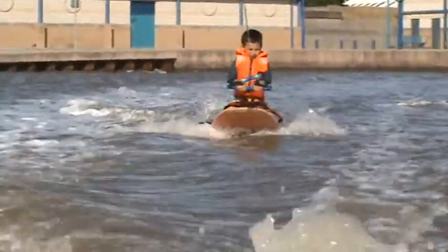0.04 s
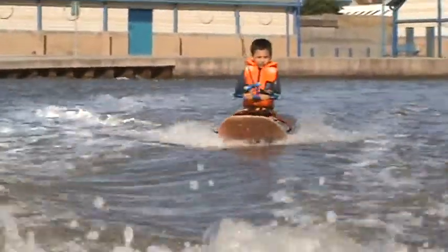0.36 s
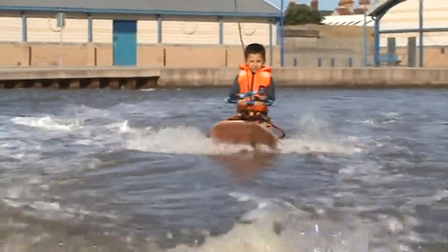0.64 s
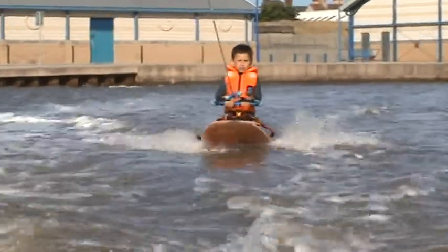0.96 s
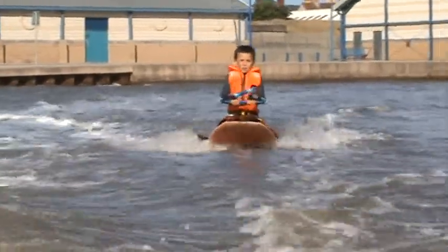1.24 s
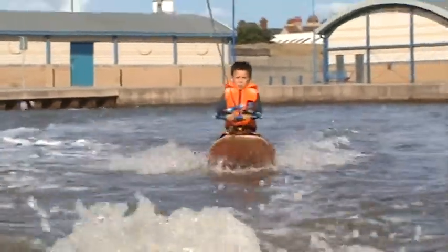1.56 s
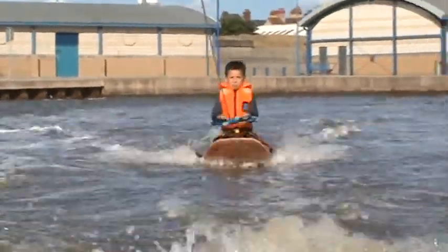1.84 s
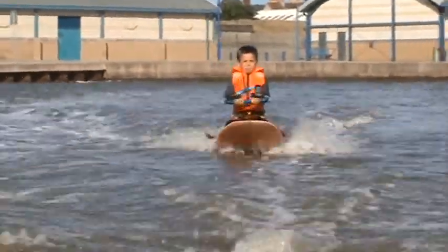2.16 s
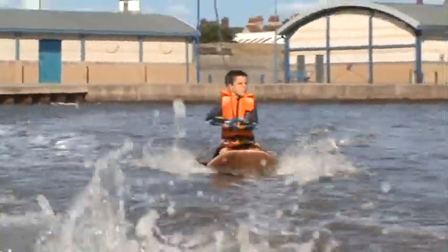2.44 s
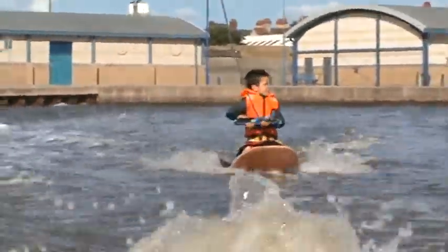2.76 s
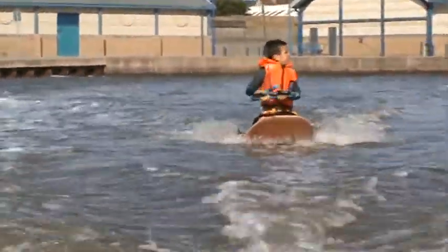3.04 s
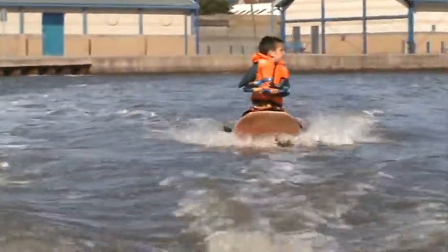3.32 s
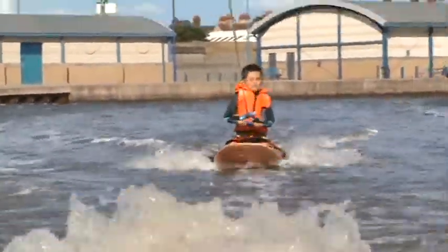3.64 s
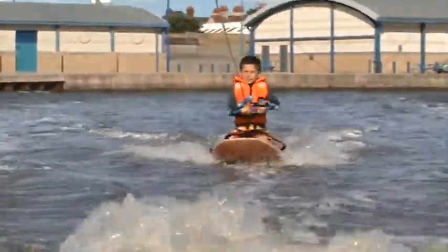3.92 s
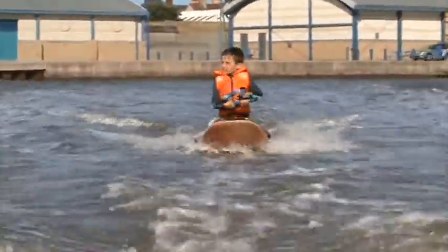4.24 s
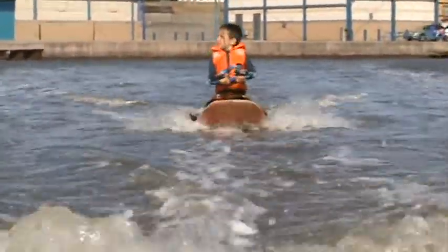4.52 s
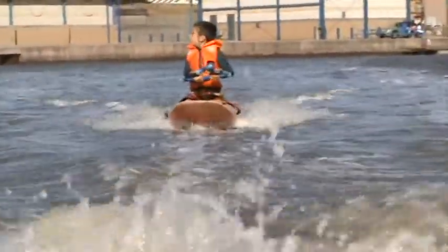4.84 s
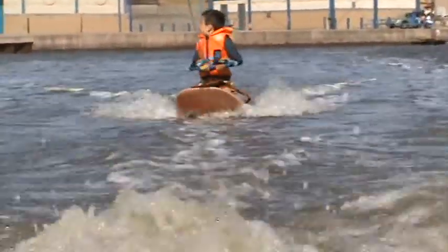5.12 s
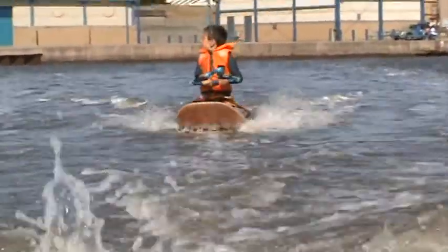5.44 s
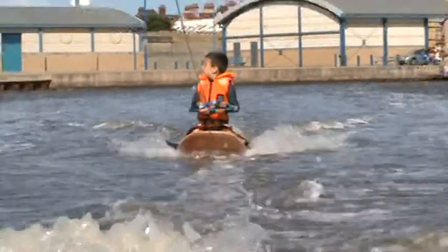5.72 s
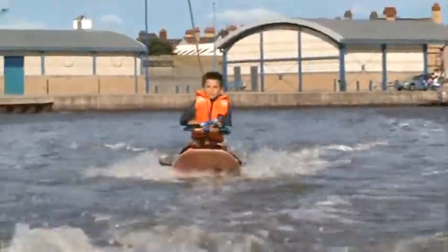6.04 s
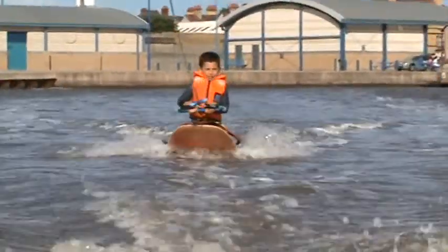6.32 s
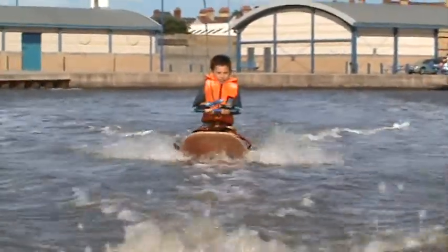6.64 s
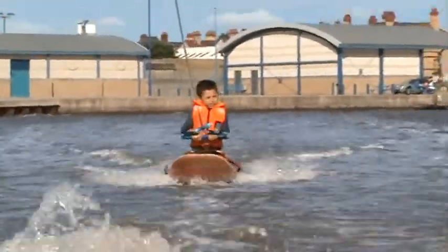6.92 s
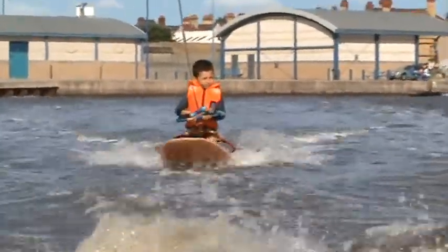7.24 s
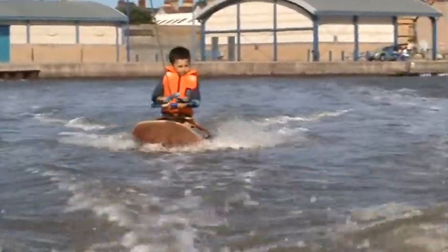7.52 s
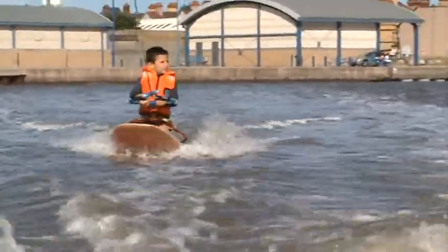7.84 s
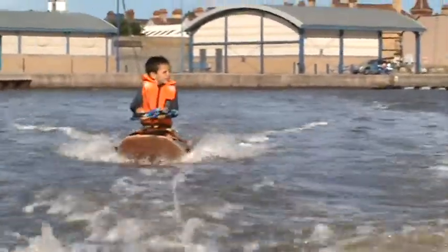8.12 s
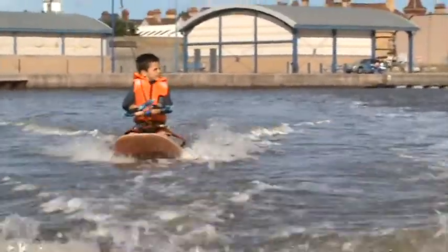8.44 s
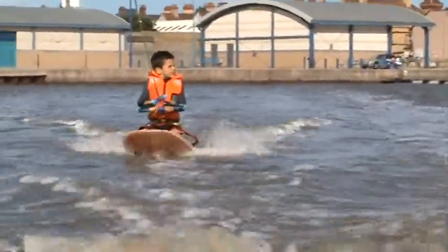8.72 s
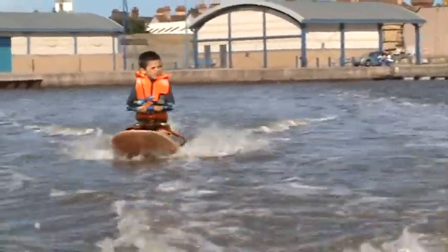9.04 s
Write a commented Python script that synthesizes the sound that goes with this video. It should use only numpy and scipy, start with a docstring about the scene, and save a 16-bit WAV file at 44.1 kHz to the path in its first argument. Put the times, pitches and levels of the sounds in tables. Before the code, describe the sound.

From the back of a moving motorboat on open water, the engine gives a constant, slightly uneven low drone that never changes speed. Churning water and splashing spray surge gently around it, with a faint pulsing whine and scattered hollow knocks. Gusts of wind thump on the microphone, more often in the second half. The overall level drops abruptly a little after halfway, then slowly recovers as the boat carries on.

```python
"""Four-cylinder motorboat engine at steady speed, heard at the stern, towing a rider over choppy water.
Firings of uneven strength ring the exhaust pipe, the last of each cycle late; shafts hum, gears throb.
The wake churns and sprays, wind and water rumble, hollow knocks sound, and gusts buffet the microphone.
The whole sound drops suddenly and creeps back up, most clearly just past the middle."""
import sys
import numpy as np
from scipy import signal
from scipy.fft import rfft, irfft
from scipy.io import wavfile
from scipy.ndimage import uniform_filter1d

SR = 44100
rng = np.random.default_rng(int(sys.argv[2]) if len(sys.argv) > 2 else 0)


def to_wav(s):
    """Save 16-bit WAV."""
    ch = np.atleast_2d(s).T  # columns
    pcm = np.round(np.clip(ch, -1, 1) * 32767)  # PCM
    wavfile.write(sys.argv[1], SR, pcm.astype(np.int16))


N = 399987
TIME = np.arange(N) / SR

# beats in firing order: strength_db, late_share_of_gap
FIRINGS = [(0.3, 0.0082), (-2.57, 0.011), (-4.5, 0.0031), (-2.5, 0.25)]
# exhaust pipe response: freq_hz, gain_db
PIPE_RESPONSE = [(25, -10), (54, -6.5), (81, 7), (108, 3), (135, -4), (190, -1.5), (216, 6), (243, -3.5),
                 (271, -1.5), (297, -15), (325, 0), (352, -29.5), (430, -13), (475, -34.5), (545, -24.5),
                 (595, -34), (660, -23.5), (1100, -53.5), (5000, -100)]
# exhaust boom at the firing rate: time_s, level_db
BOOM_CURVE = [(0.0, -27), (0.07, -22.5), (1.2, -24), (1.69, -28.5), (2.32, -22), (3.02, -26), (3.16, -22.5),
              (4.01, -25.0), (4.36, -22), (4.64, -26.5), (5.84, -24.5), (6.4, -28.5), (6.68, -22.0),
              (7.8, -34), (8.02, -23.5), (8.37, -27.5), (8.72, -23.0), (9.07, -30)]
# exhaust overtones: time_s, level_db
BARK_CURVE = [(0.0, -21), (0.35, -25), (2.74, -23), (3.45, -22.0), (4.85, -24.5), (5.34, -23.5),
              (5.55, -25.5), (6.75, -23), (6.96, -25.0), (9.07, -23.5)]
# drive train hum, plus a faint tone just above the gear whine (order 29): order_per_cycle, level_db (relative
# to BARK_CURVE)
SHAFT_LINES = [(2.5, -24), (5.5, -20.5), (9.5, -22.5), (10.5, -23), (13.5, -21.5), (14, -23), (14.5, -27),
               (23, -33), (24, -28), (29, -28.5)]
# gear whine swells: centre_s, length_s, rise_db
GEAR_SWELLS = [(.83, 0.3, 4.5), (3.0, 0.71, 2.5), (5.33, .3, 3)]
# water and wind noise spectra: freq_hz, density_db
RUMBLE_SPECTRUM = [(30, -35), (60, -3.5), (90, -3.5), (130, 2), (200, -4), (300, -5.5), (370, -8.5),
                   (460, -25), (700, -39), (2000, -58)]
CHURN_SPECTRUM = [(60, -24), (150, -6), (300, 2.5), (460, 1.5), (570, -2.5), (670, -1), (800, -5.5),
                  (1020, -16), (1250, -12), (2500, -41), (8000, -80)]
RUSH_SPECTRUM = [(300, -19), (560, -4.5), (670, 9), (770, 8), (880, 8.5), (1040, 5.5), (1280, -1),
                 (1600, 2), (2100, -2.5), (2900, -6.5), (4500, -14), (9000, -45), (14000, -70)]
SPRAY_SPECTRUM = [(900, -29), (2200, -4.5), (3400, -2), (5000, .5), (6700, -2.5), (7800, -1.5), (9300, -7),
                  (11700, -8), (13000, -15), (14800, -22.5), (16000, -24)]
WIND_SPECTRUM = [(8, -12), (22, -4), (45, 4), (70, 6), (120, -4), (250, -15), (600, -25), (2000, -80)]
# wake crests breaking into spray: centre_s, length_s, rise_db
WAKE_CRESTS = [(.66, 0.23, 2), (1.03, .2, 2.2), (1.8, 0.3, 2.5), (2.87, 0.25, 3.5), (3.08, 0.11, 2),
               (3.95, 0.46, 3.2), (6.13, 0.33, 2.1), (7.12, 0.33, 1.2), (8.38, .2, 0.2)]
# short hollow knocks: start_s, level_db, pitch_hz
KNOCKS = [(1.378, -29, 544), (2.287, -30, 850), (3.617, -30, 738), (6.080, -28, 740), (7.476, -30, 560),
          (7.788, -29, 875), (8.550, -34, 1520), (9.016, -31, 540)]
# gusts on the microphone: centre_s, length_s, rise_db
WIND_GUSTS = [(.38, 0.14, 15), (1.42, .25, 12), (2.58, .22, 11), (3.02, 0.51, 9.5), (3.85, 0.45, 9),
              (4.55, 0.44, 17), (5.45, .14, 10), (6.97, .15, 11), (7.28, 0.23, 13), (7.52, 0.18, 18),
              (7.9, 0.44, 8), (8.32, 0.15, 8), (9.05, 0.11, 14)]
# sudden drops of the whole sound: start_s, depth_db
LEVEL_DIPS = [(-.02, 1.73), (3.62, 1.94), (5.443, 5), (9.025, 5.5)]


def exhaust(cycles, uneven=0.023, jitter_s=.00003, split_hz=160, boom_trim_db=0.43, bark_trim_db=-0.34):
    """Beats of uneven strength ring the pipe, the last of each cycle late."""
    cylinders = len(FIRINGS)
    firing = np.arange(int(cylinders * cycles[-1]))
    strength_db, late = np.array(FIRINGS)[firing % cylinders].T
    size, stray = rng.standard_normal((len(firing), 2)).T
    start_s = np.interp((firing + late) / cylinders, cycles, TIME) + jitter_s * stray
    beats = np.zeros(N)
    beats[np.clip(np.round(start_s * SR).astype(int), 0, N - 1)] = -from_db(strength_db) - uneven * size
    pipe = ring(beats - beats.mean(), PIPE_RESPONSE)
    # water over the outlet shifts the weight between boom and bark
    low = lowpass(pipe, split_hz)
    boom = unit(low) * from_db(follow(BOOM_CURVE) + boom_trim_db)
    bark = unit(pipe - low) * from_db(follow(BARK_CURVE) + bark_trim_db)
    return boom + bark


def disperse(x, corner_hz=36):
    """All-pass: the lows arrive late, rounding each beat."""
    pole = np.exp(-2 * np.pi * corner_hz / SR)
    return signal.lfilter([pole, -1], [1, -pole], x)


def flutter(x, cycles, above_hz=275, swing_s=.00025):
    """Upper overtones swing in pitch once per two engine cycles."""
    low = lowpass(x, above_hz)
    return low + np.interp(TIME + swing_s * np.cos(np.pi * cycles), TIME, x - low)


def shaft_hum(cycles, unsteady=0.098):
    """Shaft tones, and a faint tone just above the whine, locked to the engine, each wavering in level."""
    hum = np.zeros(N)
    for order, level_db in SHAFT_LINES:
        gain = from_db(level_db) * (1 + unsteady * waver(1.8))
        hum += gain * np.cos(2 * np.pi * (order * cycles + rng.random()))
    return np.sqrt(2) * hum * from_db(follow(BARK_CURVE))


def pan_right(x, lag_s=.0001, tilt_db=0.7):
    """Engine right of centre: later and softer on the left."""
    left = np.interp(TIME - lag_s, TIME, x)
    return np.array([left * from_db(-tilt_db), x * from_db(tilt_db)])


def gear_whine(cycles, order=28, rough=.25, width_hz=80, sharpness=1.6, peak_cycles=.29, level_db=-41.5):
    """Rough gear-mesh tone, throbbing once per two engine cycles."""
    mesh_rad = 2 * np.pi * order * cycles
    tone = (1 + rough * waver(width_hz)) * np.cos(mesh_rad)
    tone += rough * waver(width_hz) * np.sin(mesh_rad)
    throb = np.exp(sharpness * np.cos(np.pi * (cycles - peak_cycles)))
    return unit(tone * throb) * from_db(swells(GEAR_SWELLS) + level_db)


def rumble(level_db=-28.5, gust_share=0.18):
    """Low rumble of wind and water, louder in gusts."""
    low = noise(RUMBLE_SPECTRUM, coherence=0.35, patchy_db=0.9, flicker_db=1.5)
    return low * from_db(level_db + gust_share * swells(WIND_GUSTS))


def wake(cycles, churn_db=-38, rush_db=-37.5, spray_db=-46.0, drops_db=-53,
         gust_share=0.13, crest_share=0.5, restless_db=.2, pulsing=0.07, lope=0.069):
    """Churn rises with gusts; rush and spray rise with crests and shake with the engine."""
    crest_db = swells(WAKE_CRESTS) + restless_db * waver(4.3)
    churn = noise(CHURN_SPECTRUM, coherence=0.65, patchy_db=1.0, flicker_db=1.16)
    churn *= from_db(churn_db + gust_share * swells(WIND_GUSTS))
    rush = noise(RUSH_SPECTRUM, coherence=0.88, patchy_db=0.68, flicker_db=0.1)
    rush *= from_db(rush_db + crest_share * crest_db)
    hiss = noise(SPRAY_SPECTRUM, coherence=1.0, patchy_db=0.5, flicker_db=0.8)
    spray = (hiss * from_db(spray_db) + droplets() * from_db(drops_db)) * from_db(crest_db)
    cycle_rad = 2 * np.pi * cycles
    shake = 1 + pulsing * np.cos(len(FIRINGS) * cycle_rad)
    shake += lope * (np.cos(cycle_rad) + np.cos(2 * cycle_rad))
    return churn + shake * (rush + spray)


def droplets(rate_per_s=1500, spread_db=3.5, decay_periods=2.9, top_hz=11000, pitches=24):
    """Spray lands on the water as tiny damped pings."""
    age_s, out = np.arange(600) / SR, np.zeros(N)
    candidates = 2000
    chance = rate_per_s * N / SR / pitches / candidates
    for pitch_hz in np.geomspace(1800, 10000, pitches):
        place, size, draw = rng.random((candidates, 3)).T
        size_db = spread_db * np.minimum(-np.log(size), 5)
        impacts = np.zeros(N)
        impacts[(place * N).astype(int)] = from_db(size_db) * (draw < chance)
        ping = np.sin(2 * np.pi * pitch_hz * age_s) * np.exp(-pitch_hz * age_s / decay_periods)
        out += signal.oaconvolve(impacts, ping)[:N]
    return unit(lowpass(out, top_hz, order=5))


def knocks(rise_periods=3.6, width_hz=170, rough=0.2, trim_db=1):
    """Short hollow knocks, several near the whine's pitch; low ones last longer."""
    out, grain, drift = np.zeros(N), waver(width_hz), waver(width_hz)
    for start_s, level_db, pitch_hz in KNOCKS:
        age = np.maximum(TIME - start_s, 0) * pitch_hz / rise_periods
        hollow = (1 + rough * grain) * np.sin(2 * np.pi * pitch_hz * TIME + rough * drift)
        out += hollow * age * np.exp(1 - age) * from_db(level_db + trim_db)
    return out


def wind(level_db=-46.5):
    """Low buffeting, different at each microphone port."""
    buffet = noise(WIND_SPECTRUM, coherence=.05, patchy_db=0.5, flicker_db=4.0)
    return buffet * from_db(swells(WIND_GUSTS) + level_db)


def dip_gain(fall_s=0.011, recover_db_per_s=1.27):
    """Overall gain: fast drops, steady recovery."""
    cuts_db = []
    for start_s, depth_db in LEVEL_DIPS:
        age_s = TIME - start_s
        cuts_db.append(np.clip(age_s / fall_s, 0, 1) * np.maximum(depth_db - recover_db_per_s * age_s, 0))
    return from_db(-np.max(cuts_db, axis=0))


def noise(spectrum, coherence, patchy_db, flicker_db):
    """Shaped stereo noise with drifting patches and broadband flicker; mid rms 1."""
    freq_hz = np.fft.rfftfreq(2048, 1 / SR)
    mid_re, mid_im, side_re, side_im, patches = rng.standard_normal((5, N // 512 + 5, len(freq_hz)))
    patches = unit(uniform_filter1d(uniform_filter1d(patches, size=6, axis=0), size=40, axis=1))
    flicker = unit(uniform_filter1d(rng.standard_normal(len(patches)), size=4))[:, None]
    mid = np.sqrt(1 + coherence) * (mid_re + 1j * mid_im)
    side = np.sqrt(1 - coherence) * (side_re + 1j * side_im)
    gain = from_db(spectrum_db(spectrum, freq_hz) + patchy_db * patches + flicker_db * flicker)
    frames = np.array([mid + side, mid - side]) * gain
    pair = signal.istft(frames.swapaxes(1, 2), nperseg=2048, noverlap=1536)[1][:, :N]
    return pair / pair.mean(axis=0).std()


def ring(x, spectrum):
    """Minimum-phase body: rings only after it is struck."""
    freq_hz = abs(np.fft.fftfreq(8192, 1 / SR))
    log_gain = np.log(from_db(spectrum_db(spectrum, freq_hz)))
    response = np.fft.ifft(np.exp(np.conj(signal.hilbert(log_gain)))).real[:4096]
    return signal.oaconvolve(x, response)[:N]


def lowpass(x, cutoff_hz, order=4):
    """Smooth zero-phase low-pass."""
    size = 2 ** 19
    freq_hz = np.fft.rfftfreq(size, 1 / SR)
    return irfft(rfft(x, size) / (1 + (freq_hz / cutoff_hz) ** (2 * order)))[..., :N]


def waver(width_hz):
    """Random drift, rms 1."""
    return unit(lowpass(rng.standard_normal(N), width_hz, order=2))


def swells(rows):
    """Sum of bell curves in dB; lengths at half height."""
    return sum(rise_db * .5 ** ((2 * (TIME - centre_s) / length_s) ** 2)
               for centre_s, length_s, rise_db in rows)


def spectrum_db(points, freq_hz):
    """Level interpolated over log frequency."""
    knots_hz, knots_db = np.transpose(points)
    return np.interp(np.log(freq_hz + 1), np.log(knots_hz), knots_db)


def follow(rows):
    """Linear interpolation over time."""
    return np.interp(TIME, *np.transpose(rows))


def from_db(db):
    """Decibels to gain."""
    return 10 ** (np.asarray(db) / 20)


def unit(x):
    """Scale to rms 1."""
    return x / np.sqrt(np.mean(x ** 2) + 1e-20)


def scene(cycle_hz=27.05, wander_cycles=0.0099):
    """Engine at held throttle, water and wind."""
    cycles = cycle_hz * TIME + wander_cycles * waver(1.16)
    drone = flutter(disperse(exhaust(cycles)), cycles)
    engine = pan_right(drone + shaft_hum(cycles)) + gear_whine(cycles)
    return (engine + rumble() + wake(cycles) + knocks() + wind()) * dip_gain()


def record(dry):
    """Steep low-pass."""
    edge_hz = 15700
    taps = signal.firwin(511, edge_hz, window=("kaiser", 9), fs=SR)
    return signal.oaconvolve(dry, taps[None], "same")


dry = scene()
out = record(dry)
to_wav(out)
```